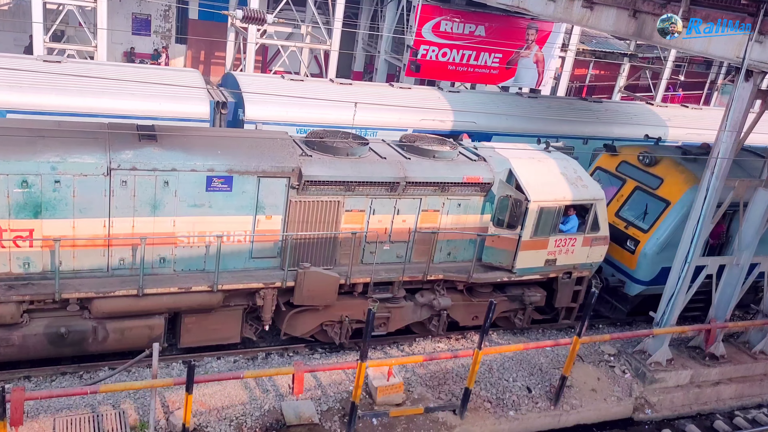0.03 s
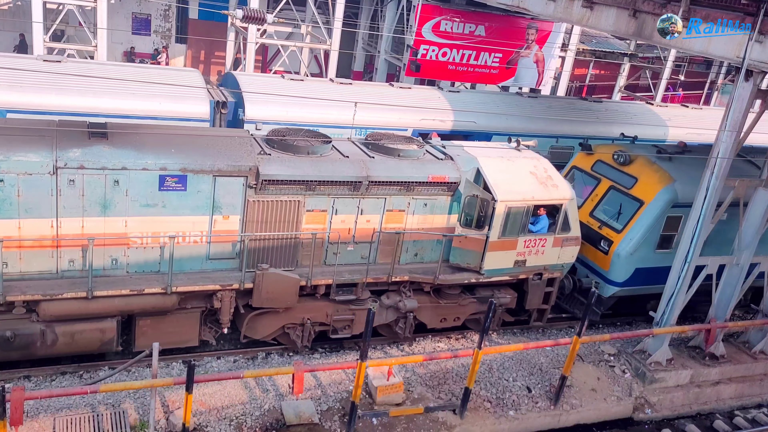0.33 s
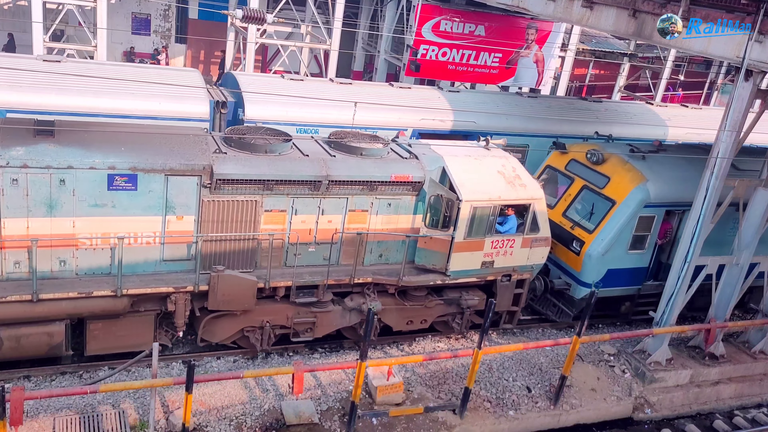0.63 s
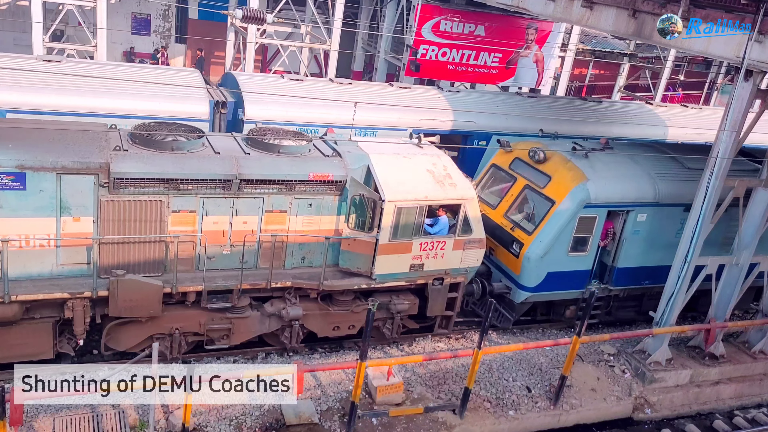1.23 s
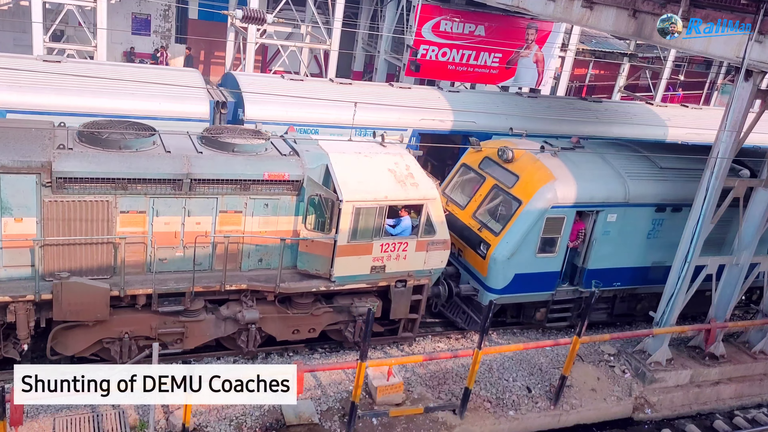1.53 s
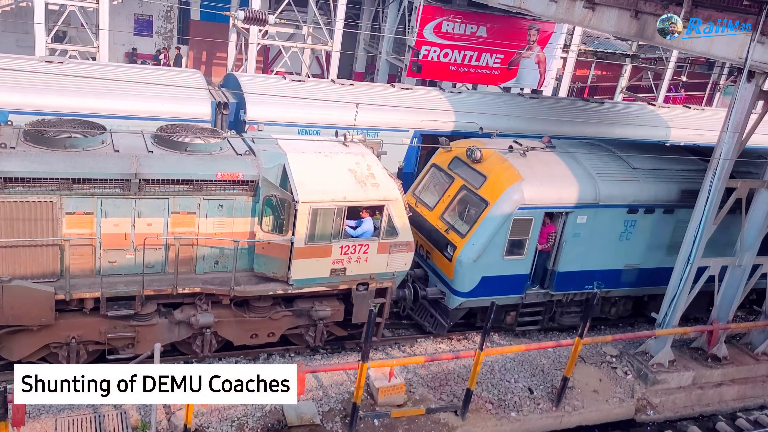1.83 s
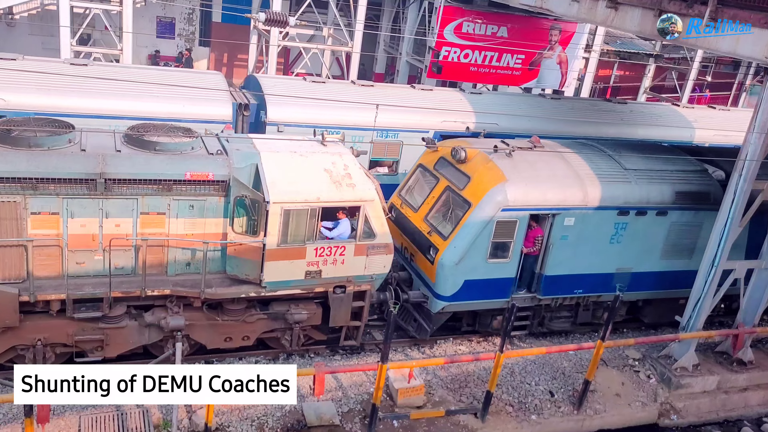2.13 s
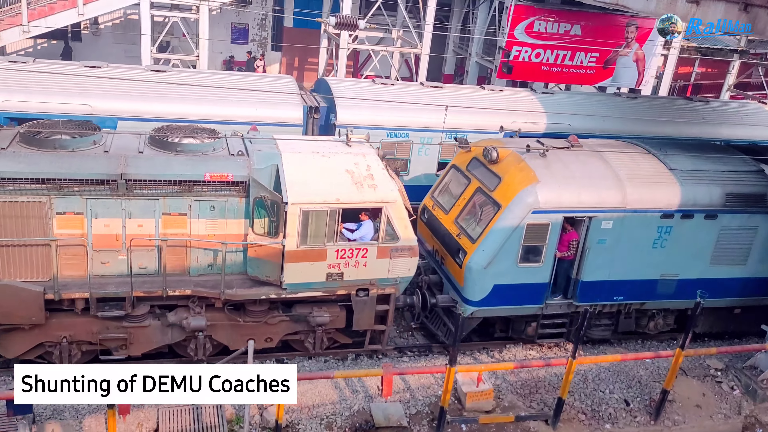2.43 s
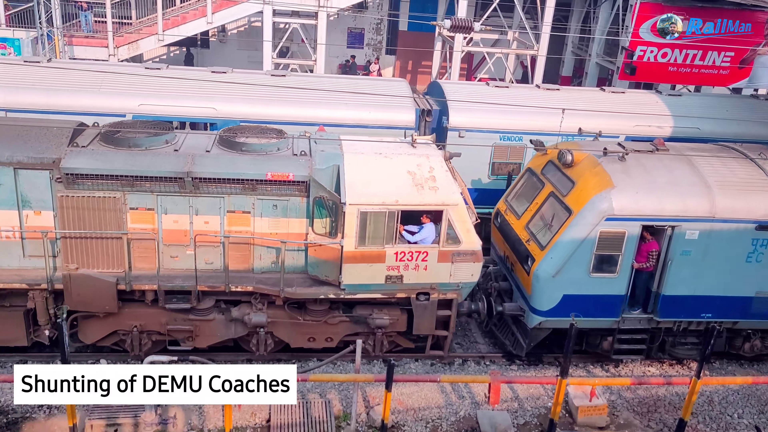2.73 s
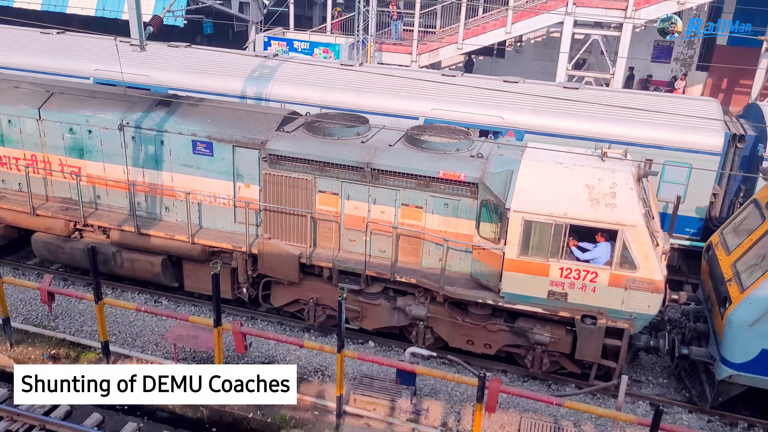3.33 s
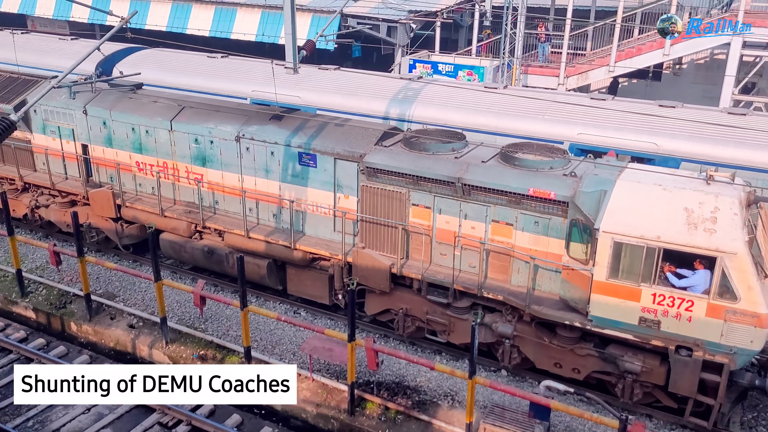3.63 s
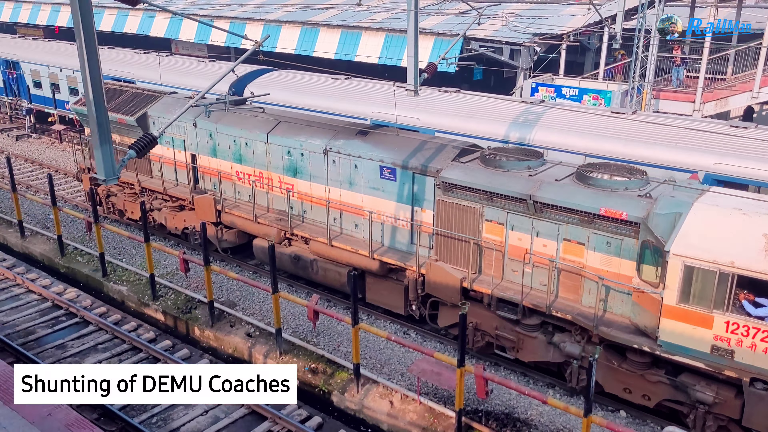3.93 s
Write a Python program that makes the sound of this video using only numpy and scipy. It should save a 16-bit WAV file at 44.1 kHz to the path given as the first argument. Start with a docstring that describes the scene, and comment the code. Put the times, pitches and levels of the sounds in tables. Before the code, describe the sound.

A diesel locomotive throbs with roaring fans and a thin whistle, and gives one short two-tone horn blast that echoes around a rail yard. The engine then swells as it passes the trackside microphone, wheels faintly squealing.

```python
"""Diesel locomotive in a station yard

A two-stroke diesel creeps up alongside a stereo microphone pair, its exhaust orders beating into a throb
under a roar of fans and a turbine whistle. Compressed air sounds one short blast on its two-tone horn,
which coaches and buildings throw back. Straight ahead, wheels rub and squeal faintly.
The recorder's gain control ducks at the horn, holds for a second, then lets the engine swell again."""
import sys
import numpy as np
from scipy import signal
from scipy.fft import rfft, irfft
from scipy.io import wavfile
from scipy.ndimage import uniform_filter1d, minimum_filter1d

SR = 44100
rng = np.random.default_rng(int(sys.argv[2]) if len(sys.argv) > 2 else 0)


def output_pcm(signal):
    """Save a mono or channel-first signal as 16-bit PCM at the path in sys.argv[1].

    Samples are clipped to [-1, 1] before scaling.
    """
    pcm = np.clip(np.atleast_2d(signal).T, -1, 1) * 32767
    wavfile.write(sys.argv[1], SR, np.round(pcm).astype(np.int16))


N = 176400
T, HZ = np.arange(N) / SR, np.fft.rfftfreq(N, 1 / SR)
TOP_HZ = 15900


# Exhaust tones, deep and upper group: multiple of crank speed, level approaching/dB, level alongside/dB
BOOM_ORDERS = [(7, -43, -40), (8, -26, -18), (9, -24, -30), (10, -31, -32), (11, -37, -35)]
THROB_ORDERS = [(12, -33, -35), (13, -21, -19), (14, -31, -28), (15, -11, -17), (16, -24, -23),
                (17, -21, -18), (19, -42, -38), (23, -32, -35), (24, -39, -38), (39, -35, -37),
                (42, -37, -39)]
BOOM_AT_S, THROB_AT_S = .09, .143  # when each group swells

def exhaust(turns, near):
    """Crank orders beat into a throb that smears as the engine draws alongside, over a loose rumble."""
    out = np.zeros(N)
    for orders, swell_s in ((BOOM_ORDERS, BOOM_AT_S), (THROB_ORDERS, THROB_AT_S)):
        angle = 2 * np.pi * (turns - np.interp(swell_s, T, turns))
        for k, far_db, near_db in orders:
            shift = 0
            if orders is THROB_ORDERS and k < 20:
                shift = .04 * near * (k - 15) ** 2 - (k % 2 == 0) / 4  # even orders lag a quarter cycle
            level_db = far_db + (near_db - far_db) * near + .5 * wander(5)
            out += amp(level_db) * np.cos(k * angle + 2 * np.pi * shift)
    return out + amp(-31) * band(hz=68, width_hz=40)


# Roar spectrum from down the track and from alongside: f/Hz, relative level/dB
FAR_ROAR = [(100, -12), (170, -8.5), (239, -3), (471, -15), (662, -7.5), (984, -18.5), (1330, -20),
            (1490, -20), (2090, -22), (2830, -19), (3110, -26), (4460, -30), (5180, -27.5), (6030, -32.5),
            (8800, -40.5), (10600, -36), (15500, -43.5)]
NEAR_ROAR = [(120, 6), (200, -3), (245, 2), (340, -4.5), (560, -6), (680, -2), (880, -10.5), (1400, -10),
             (2200, -16), (3200, -17), (4200, -21), (5300, -19.5), (6400, -29), (9000, -37), (15500, -34)]
# Fan and gear resonances: f/Hz, width/Hz, level approaching/dB, level alongside/dB
FAN_WHINES = [(653, 22, -32.5, -33.5), (766, 38, -39, -50.5), (1300, 28, -38.5, -47), (2850, 44, -37, -41),
              (3363, 30, -39.5, -42.5), (5185, 67, -42, -38.5), (10500, 200, -48, -49)]

def roar(turns, near):
    """Turbulent exhaust and fan noise with steady resonances, pulsing slightly twice a turn."""
    low_cut = 1 / np.sqrt(1 + (123 / (HZ + 1)) ** 8)
    out = amp(-23) * np.sqrt(1 - near) * noise(amp(read(FAR_ROAR, HZ)) * low_cut)
    out += amp(-23.5) * np.sqrt(near) * noise(amp(read(NEAR_ROAR, HZ)) * low_cut)
    for hz, width, far_db, near_db in FAN_WHINES:
        out += amp(far_db + (near_db - far_db) * near) * band(hz, width)
    # patches of the spectrum swell and fade at random
    spectra = signal.stft(out, nperseg=512)[2]
    patches = uniform_filter1d(rng.standard_normal(spectra.shape[1:]), size=7, axis=0)
    patch_db = 1.5 * unit(uniform_filter1d(patches, size=12, axis=1))
    out = signal.istft(spectra * amp(patch_db), nperseg=512)[1][:, :N]
    pulse_db = .15 * np.cos(2 * np.pi * 2 * (turns - np.interp(THROB_AT_S, T, turns)))
    return out * amp(.33 * wander(27) + pulse_db)


# Horn bells, high then low: start/s, end/s, f/Hz, starting sharpness/ratio, settling/s, rise/s, level/dB
HORN_BELLS = [(.679, .945, 419.8, .04, .034, .022, 3), (.718, .965, 306, .07, .038, .03, 1)]
# Timbre of each bell: harmonic number, relative level/dB
HIGH_HARMONICS = [(1, -0.5), (2, 0), (3, -9), (4, -7.5), (5, -8.5), (6, -10.5), (7, -13.5), (8, -18.5),
                  (9, -15), (10, -15), (11, -19.5), (12, -22), (13, -33), (14, -28), (15, -26), (16, -18),
                  (17, -22.5), (18, -42), (20, -38)]
LOW_HARMONICS = [(1, 3.5), (2, -3), (3, -14.5), (4, -20), (5, -25), (6, -18), (7, -20), (8, -22), (9, -27),
                 (10, -29), (12, -25), (20, -27.5)]
# Air rushing through the horn: f/Hz, relative level/dB
AIR_SPECTRUM = [(300, -2.5), (1000, 1), (3000, 0), (7000, -10.5), (9500, -13), (13000, -7), (15500, -31)]
# Horn at the microphones: f/Hz, left minus right/dB
HORN_PAN = [(300, -6), (420, -3), (700, -1), (1290, -5), (2380, -7), (4400, -4.5), (8120, -6.5), (15000, 3)]
HORN_RELEASE_S = .032

def horn():
    """Two bells and the rush of compressed air that drives them, sounded on the approach."""
    high, low = HORN_BELLS
    start, end = high[:2]
    air_envelope = np.sqrt(ramp(start, .2)) * decay(end, HORN_RELEASE_S)
    air = amp(-13.5) * noise(amp(read(AIR_SPECTRUM, HZ))) * air_envelope
    return microphones(bell(*high, HIGH_HARMONICS) + bell(*low, LOW_HARMONICS) + air, HORN_PAN)


def bell(start, end, hz, sharp, settle, rise, db, harmonics):
    """A diaphragm starts sharp, settles on the pitch of its bell and rasps as the valve closes."""
    rasp = np.exp(-((T - .938) / .025) ** 2)
    pitch = hz * (1 + sharp * decay(start, settle) + .0016 * wander(70) + .005 * rasp * wander(120))
    phase = 2 * np.pi * np.cumsum(pitch) / SR
    k = np.arange(1, int(TOP_HZ / hz) + 1)
    gains = amp(np.interp(k, *np.transpose(harmonics)) - .1 * np.maximum(k - 20, 0))
    swell_db = 7 * (np.clip(T, start, end) - (start + end) / 2)  # brighter as the air pressure builds
    flutter = [amp(2.4 * wander(12) + 5.5 * rasp + swell_db) for _ in range(7)]
    overtones = sum(gain * flutter[n % len(flutter)] * np.cos(n * phase + n ** 2 / 10)
                    for n, gain in zip(k[1:], gains[1:]))
    crack_db = -13 * np.exp(-((T - .714) / .015) ** 2)  # the fundamental dips: a crack up an octave
    fundamental = gains[0] * amp(crack_db) * np.cos(phase)
    tone = fundamental * ramp(start, rise) + overtones * ramp(start + .0038, rise)  # overtones bloom late
    return amp(db) * tone * decay(end, HORN_RELEASE_S)


# Turbine whistle above the exhaust: t/s, level/dB
WHISTLE_LEVEL = [(0, -26.5), (.15, -53), (.5, -32.5), (.7, -39), (1.4, -44), (1.8, -30.5), (2.25, -34.5),
                 (2.65, -29.5), (3.0, -29.5), (3.25, -27), (3.46, -41.5), (3.52, -32), (3.63, -53),
                 (3.72, -37), (3.8, -45), (3.97, -30.5)]

def turbine(turns):
    """A high whistle that swings with each turn of the crank and flutters in the hot air."""
    hz = 5242 + 5.9 * np.cos(2 * np.pi * turns) + 10.7 * wander(26)
    phase = 2 * np.pi * np.cumsum(hz) / SR
    flutter = np.array([wander(43) * np.cos(phase) + wander(33) * np.sin(phase) for _ in range(2)])
    return amp(curve(WHISTLE_LEVEL)) * unit(np.cos(phase) + .77 * flutter)


# Hiss of wheels on the rail, growing as they near: t/s, level/dB
RUB_LEVEL = [(0, -83), (2.5, -43), (2.85, -40.5), (3.0, -43), (3.3, -37), (3.5, -48), (3.8, -41),
             (3.92, -31), (4, -35)]
# Colour of that hiss: f/Hz, relative level/dB
RUB_COLOUR = [(2500, -44), (4200, 12), (5500, -15), (6500, 0.5), (9000, -2.5), (15000, -1.5)]
# Squeals, dead centre: start/s, end/s, rise/s, f/Hz, level/dB, second harmonic/dB, third harmonic/dB
FLANGE_SQUEALS = [(2.29, 2.46, .04, 3380, -37, -30, -30), (2.5, 3.23, .45, 1191, -35, -25, -30),
                  (3.21, 3.28, .03, 3390, -37, -30, -30), (3.2, 3.5, .08, 955, -40, -25, -30),
                  (3.32, 3.45, .04, 3390, -34, -30, -30), (3.7, 3.78, .04, 3395, -39, -30, -30),
                  (3.85, 4.1, .06, 3805, -33, -17, -13)]

def wheels():
    """Flanges rub the rail and ring in short, wavering squeals."""
    out = amp(curve(RUB_LEVEL)) * noise(amp(read(RUB_COLOUR, HZ)) * (HZ > 1000))
    for start, end, rise, hz, db, second_db, third_db in FLANGE_SQUEALS:
        phase = 2 * np.pi * np.cumsum(hz * (1 + .0009 * wander(36))) / SR
        tone = np.sin(phase) + amp(second_db) * np.sin(2 * phase) + amp(third_db) * np.sin(3 * phase)
        envelope = ramp(start, rise) * (1 - ramp(end - .02, .02))
        out += unit(tone) * amp(db + 1.8 * wander(23)) * envelope
    return out


# Traction gears, dead centre: t/s, f/Hz, level/dB
GEAR_HUM = [(0, 148, -60), (2.6, 154, -50), (3.2, 158, -36), (3.6, 162, -27.5), (4, 165, -31.5)]

def gears():
    """The traction gears hum, rising a little in pitch and coming up once alongside."""
    phase = 2 * np.pi * np.cumsum(curve(GEAR_HUM)) / SR
    return amp(curve(GEAR_HUM, column=2) + 2 * wander(5.1)) * unit(np.sin(phase))


# Returns from coaches and buildings, nearest first: delay/s, level/dB, lag at the left microphone/s
YARD_ECHOES = [(.064, -6.5, .0011), (.105, -15.5, -.0002), (.228, -23, -.0003), (0.334, -28.5, .0005)]
# Reverberation of the yard: f/Hz, time to fall 60 dB/s
YARD_DECAY = [(300, 1.63), (600, 1.03), (1300, 1.21), (3000, 1.34), (6000, 1.01), (14000, 0.43)]

def yard(direct):
    """The direct sound, then a few dull echoes and a diffuse tail from around the yard."""
    reflections = sum(amp(db) * np.exp(-2j * np.pi * HZ * np.array([[delay + lag], [delay]]))
                      for delay, db, lag in YARD_ECHOES)
    echoes = irfft(rfft(direct) * reflections / (1 + 1j * HZ / 3150), N)
    taps = rng.standard_normal((2, SR)) * (rng.random((2, SR)) < 2000 / SR) * ramp(.0094, .013)[:SR]
    hz, t, spectra = signal.stft(taps, SR, nperseg=256)
    tail = signal.istft(spectra * amp(-60 * t / read(YARD_DECAY, hz)[:, None]), SR, nperseg=256)[1]
    diffuse = signal.fftconvolve(direct, tail / np.linalg.norm(tail[0]), axes=1)[:, :N]
    return direct + echoes + amp(-14) * diffuse


def microphones(x, pan, left_lead_s=.000365):
    """Sound reaches the left microphone first; the two sides differ in level."""
    tilt = amp(read(pan, HZ) / 2)
    return irfft(rfft(x) * np.array([tilt * np.exp(2j * np.pi * HZ * left_lead_s), 1 / tilt]), N)


# Likeness of noise across the pair: f/Hz, correlation (clipped to 0..1 in use)
PAIR_LIKENESS = [(100, -0.4), (300, 3.35), (700, 0.12), (1500, 0.55), (4000, 0.15), (9000, 0.27),
                 (15000, -1.9)]

def noise(shape):
    """Noise with the given spectrum, partly alike at the two microphones."""
    left, other = rfft(rng.standard_normal((2, N)))
    same = np.clip(read(PAIR_LIKENESS, HZ), 0, 1)
    right = same * left + np.sqrt(1 - same ** 2) * other
    return unit(irfft(np.array([left, right]) * shape, N))


def band(hz, width_hz):
    """Noise in one steep resonance."""
    return noise(1 / (1 + (1.23 * (HZ - hz) / width_hz) ** 2))


def wander(hz):
    """Random drift of rms 1, mostly slower than hz."""
    return unit(irfft(rfft(rng.standard_normal(N)) / (1 + (HZ / hz) ** 4), N))


def amp(db):
    """Decibels to gain."""
    return 10 ** (np.asarray(db) / 20)


def unit(x):
    """Scales to rms 1."""
    return x / np.sqrt(np.mean(abs(x) ** 2) + 1e-20)


def read(points, hz):
    """Reads a table on a log-frequency axis."""
    f, value = np.transpose(points)
    return np.interp(np.log(hz + 1), np.log(f + 1), value)


def curve(points, column=1):
    """Reads one column of a table over time."""
    rows = np.array(points)
    return np.interp(T, rows[:, 0], rows[:, column])


def ramp(start, length):
    """A smooth step from 0 to 1."""
    return np.sin(np.pi / 2 * np.clip((T - start) / length, 0, 1)) ** 2


def decay(start, tau):
    """Holds at 1 until start, then dies away exponentially."""
    return np.exp(-np.maximum(T - start, 0) / tau)


# Crankshaft: t/s, speed/(turns per second)
CRANK_SPEED = [(0, 5.932), (2, 5.93), (4, 5.91)]
# Engine at the microphones: f/Hz, left minus right/dB
ENGINE_PAN = [(60, 2.5), (110, -0.5), (200, 0), (380, -2.5), (700, -0.5), (1290, -3), (2380, -4),
              (4400, -3), (8120, -4), (15000, 2.5)]

def scene():
    """From the trackside: the locomotive and its horn to the left, the wheels straight ahead."""
    turns = np.cumsum(curve(CRANK_SPEED)) / SR
    near = ramp(2.28, .56)  # 0 approaching, 1 alongside
    engine = exhaust(turns, near) + roar(turns, near) + turbine(turns)
    return microphones(engine, ENGINE_PAN) + wheels() + gears() + yard(horn())


def record(dry):
    """The recorder: a low cut, gain control that ducks, holds and recovers, soft ceiling, band limit."""
    limit_db, hold_s, recover_db_per_s, ceiling = -15.5, 1.175, 29.5, .86
    dry = irfft(rfft(dry) / np.sqrt(1 + (44 / (HZ + 1)) ** 12), N)
    sensed = signal.sosfilt(signal.butter(2, 270, "high", fs=SR, output="sos"), dry)  # deaf to the bass
    power = abs(uniform_filter1d((sensed ** 2).mean(0), size=500))
    over_db = np.maximum(10 * np.log10(power + 1e-12) - limit_db, 0)
    half = int(hold_s * SR / 2)
    held_db = -minimum_filter1d(-over_db, 2 * half + 1, origin=half, mode="constant")
    recovery_db = T * recover_db_per_s
    slow_db = np.maximum.accumulate(.66 * held_db + recovery_db) - recovery_db
    ducked = dry * amp(-uniform_filter1d(slow_db + .14 * over_db, size=200))
    rounded = ducked / (1 + (ducked / ceiling) ** 10) ** (1 / 10)
    band_limit = signal.firwin(511, TOP_HZ, window=("kaiser", 9), fs=SR)
    return signal.oaconvolve(rounded, band_limit[None], "same")


dry = scene()
out = record(dry)
output_pcm(out)
```